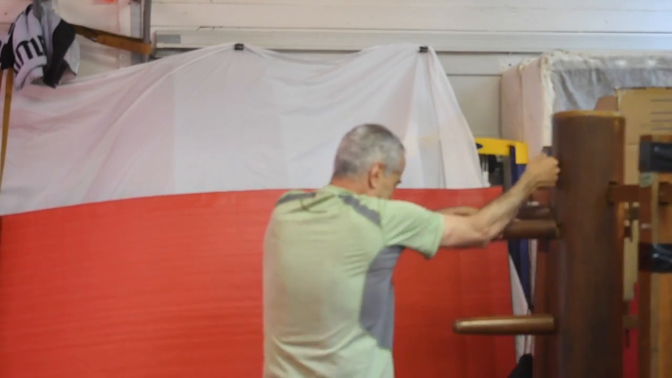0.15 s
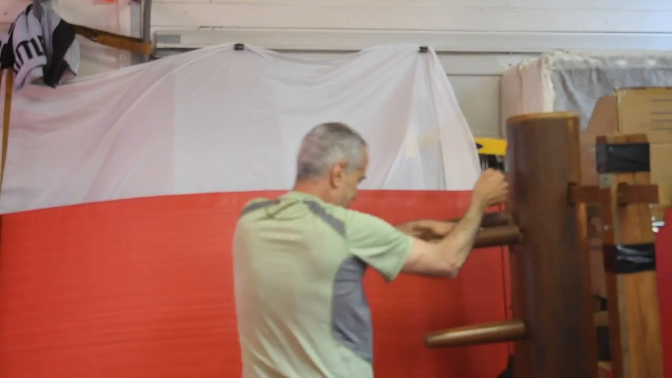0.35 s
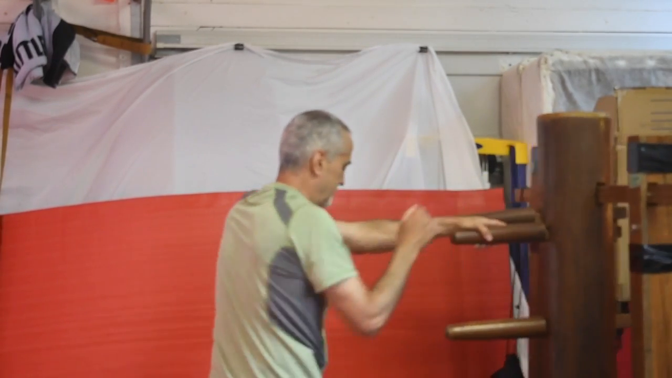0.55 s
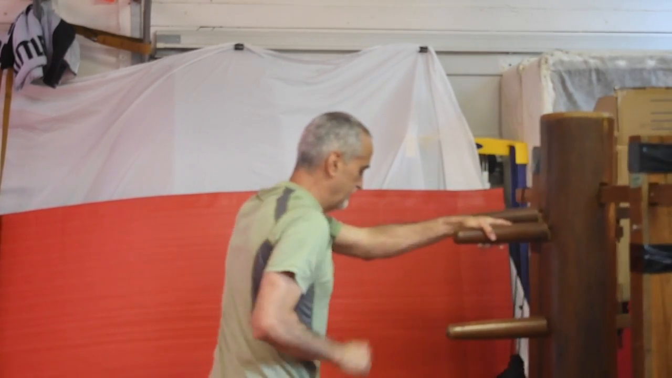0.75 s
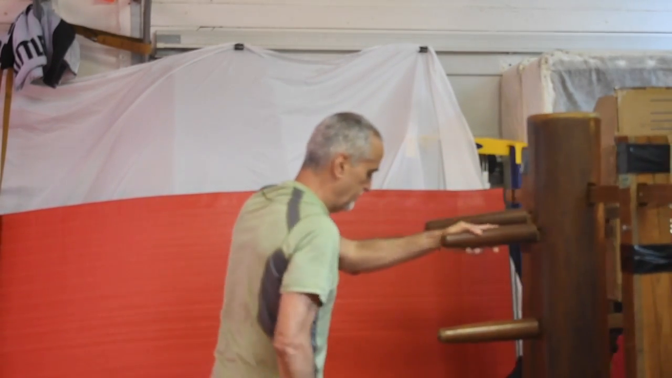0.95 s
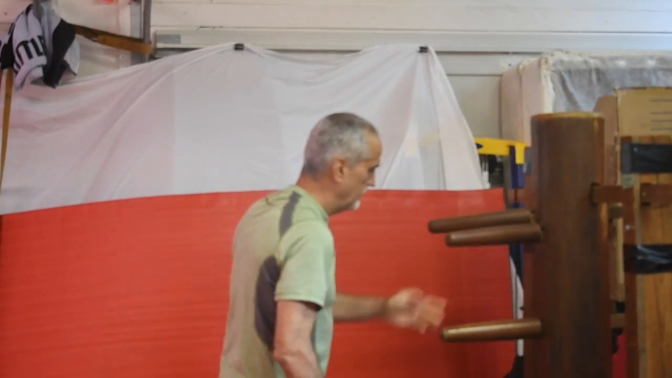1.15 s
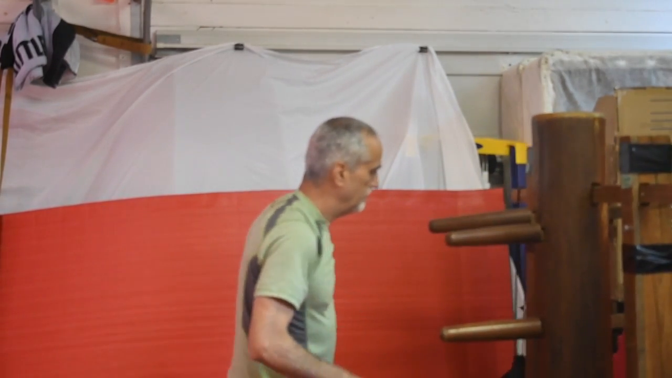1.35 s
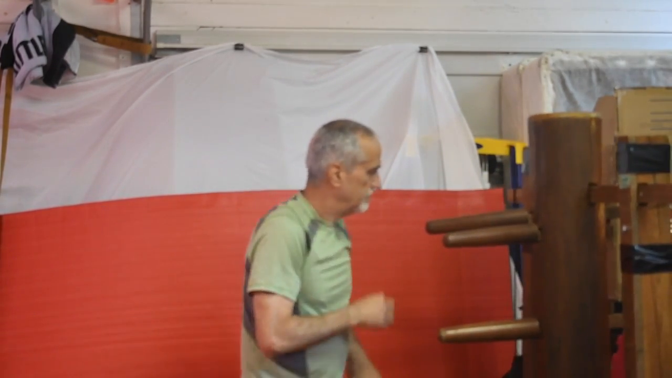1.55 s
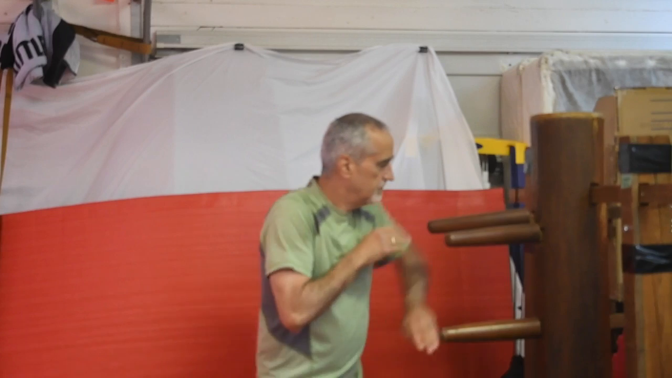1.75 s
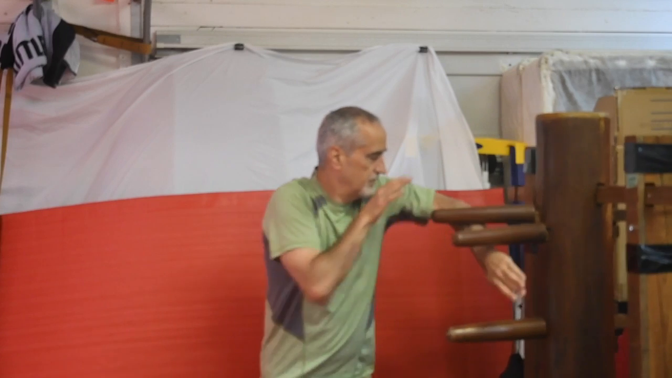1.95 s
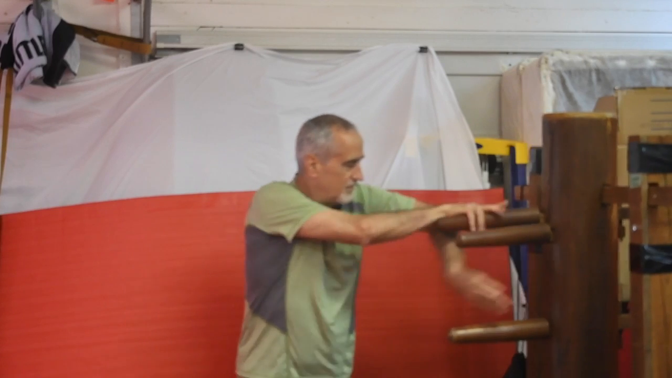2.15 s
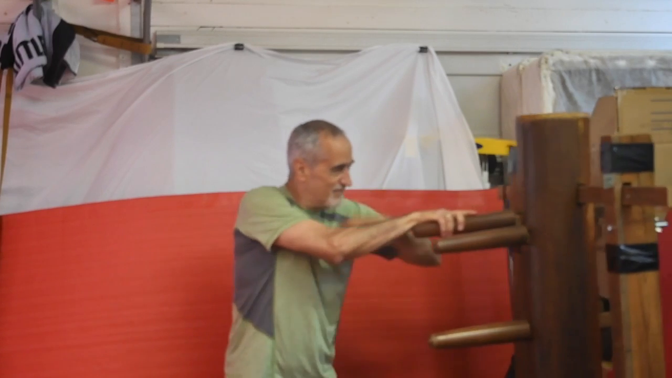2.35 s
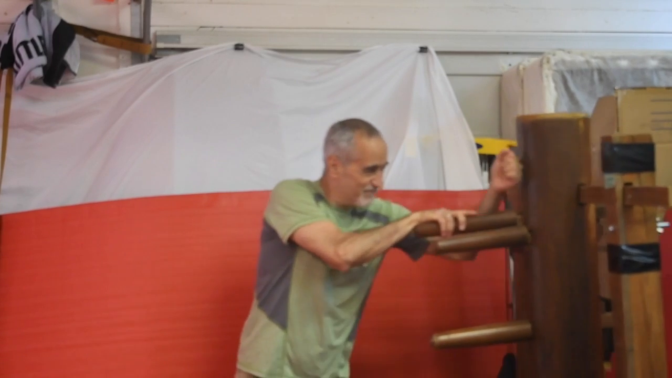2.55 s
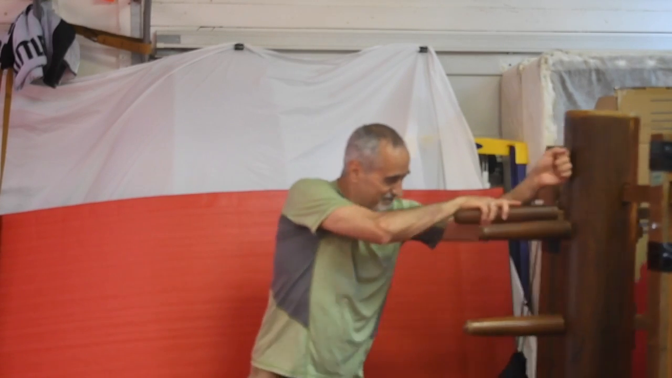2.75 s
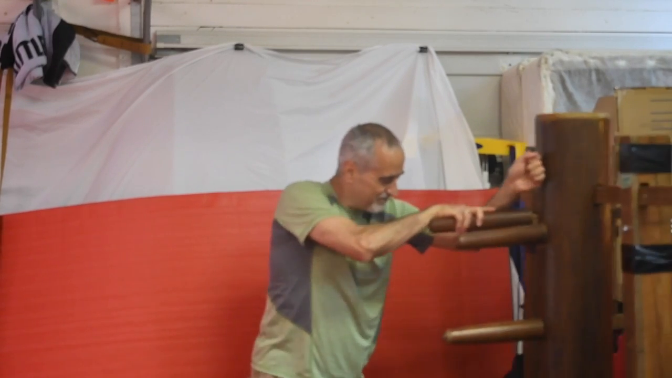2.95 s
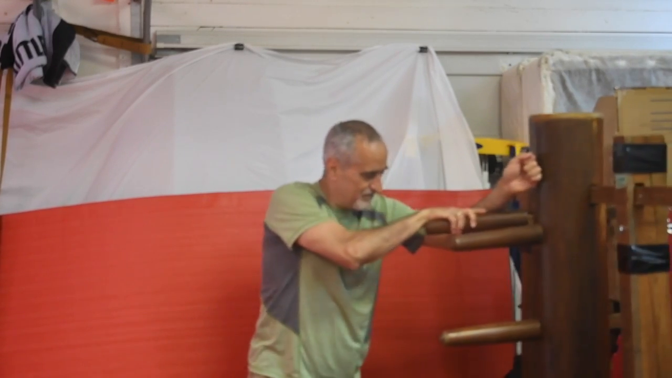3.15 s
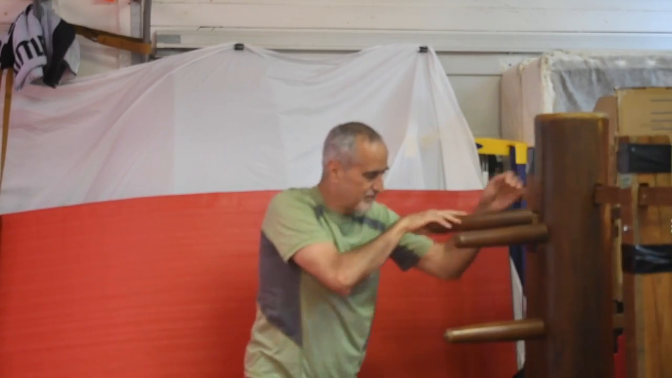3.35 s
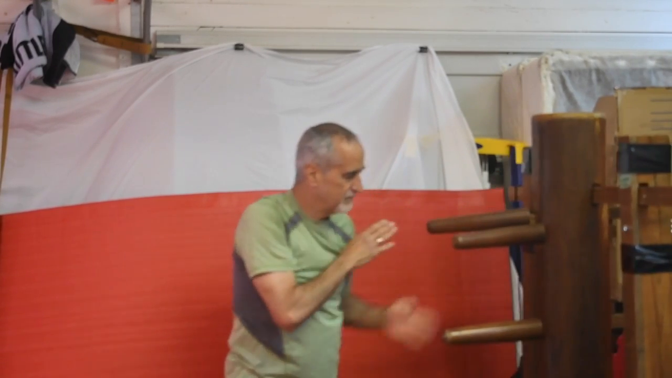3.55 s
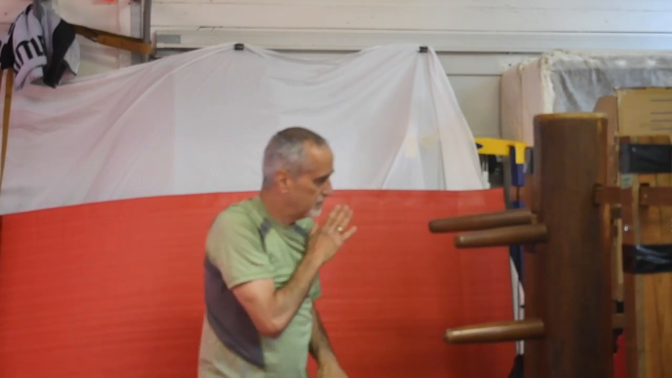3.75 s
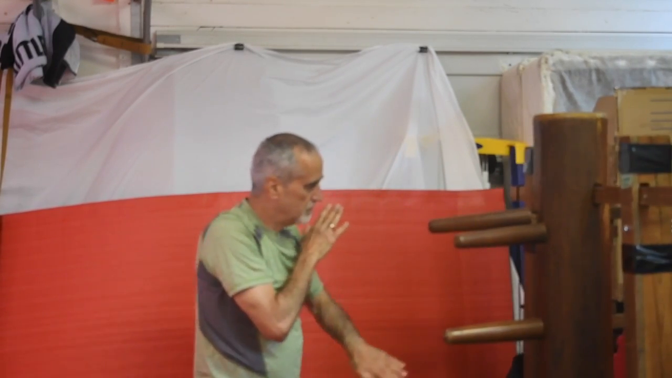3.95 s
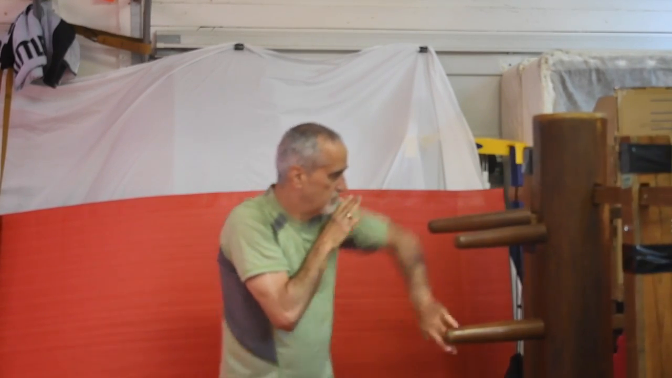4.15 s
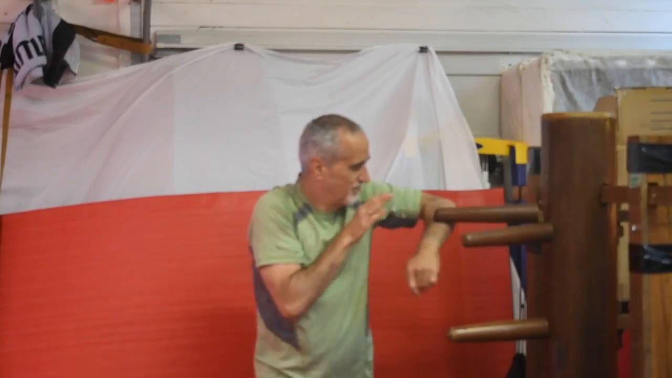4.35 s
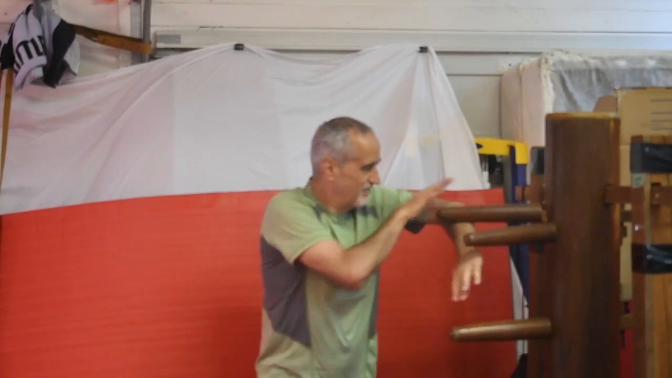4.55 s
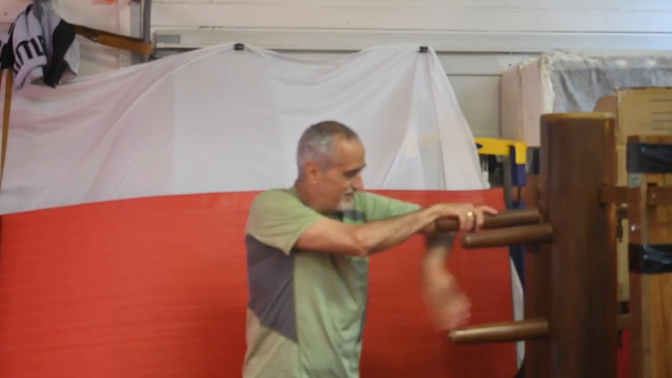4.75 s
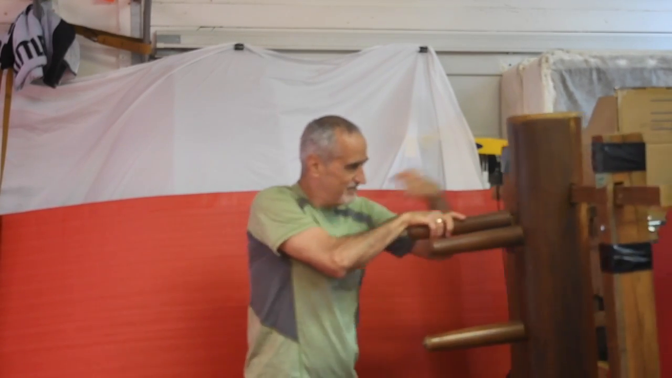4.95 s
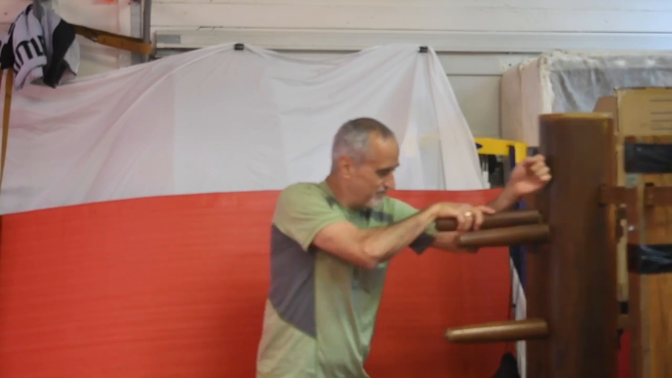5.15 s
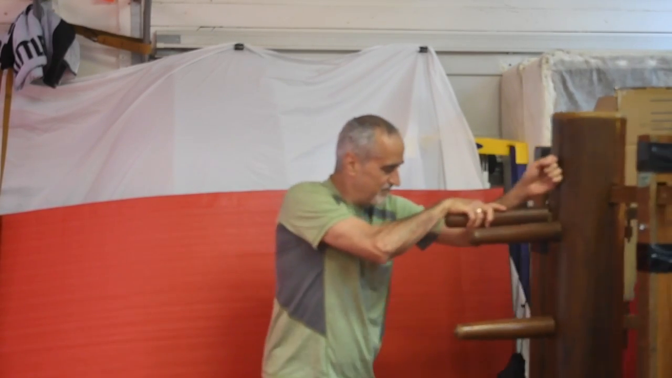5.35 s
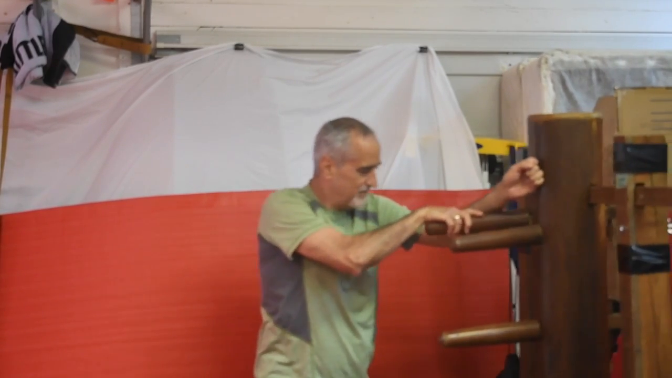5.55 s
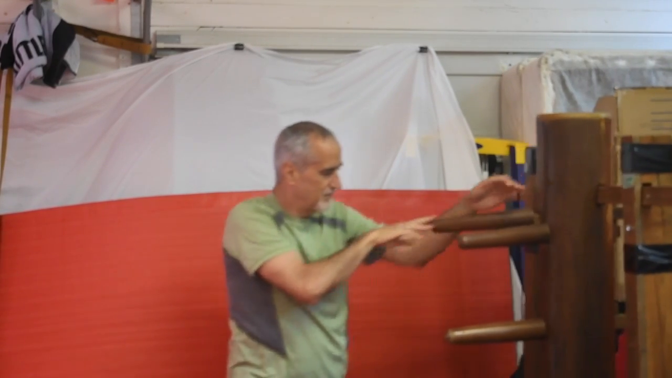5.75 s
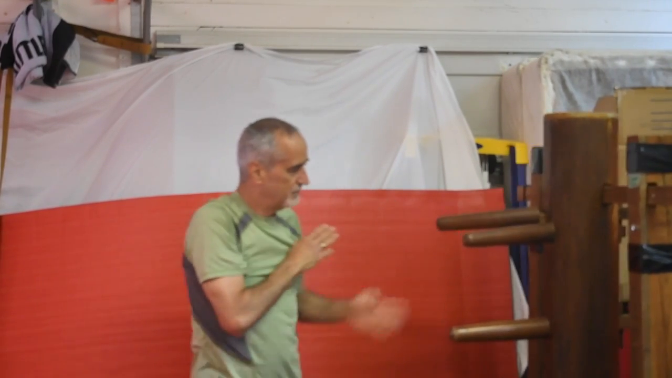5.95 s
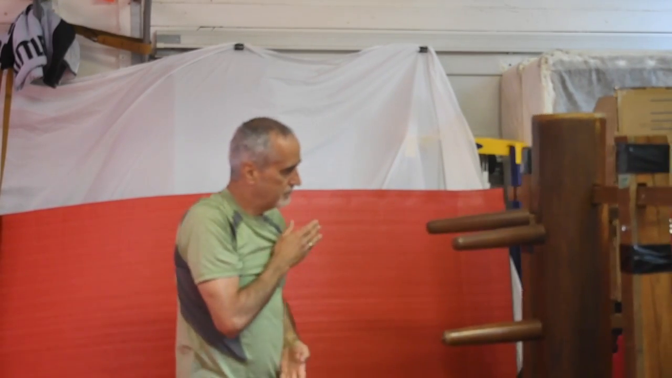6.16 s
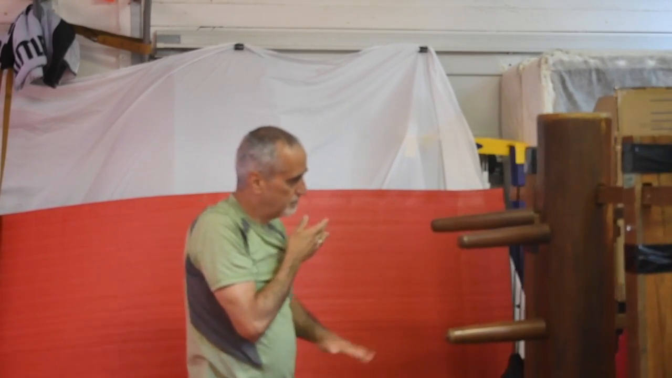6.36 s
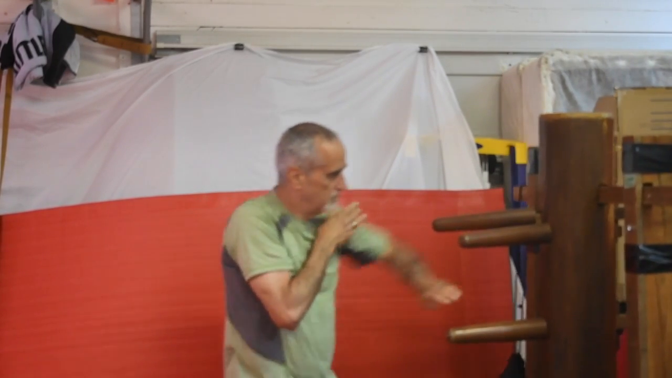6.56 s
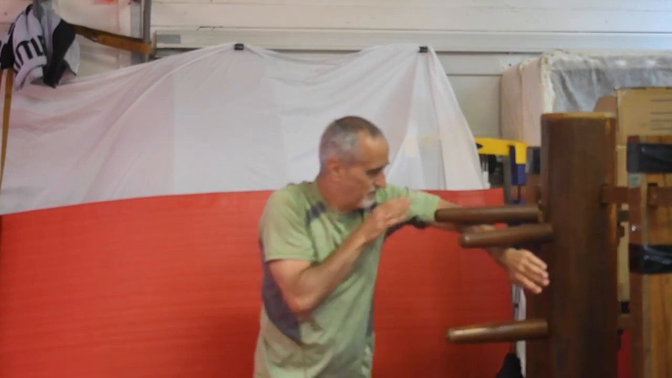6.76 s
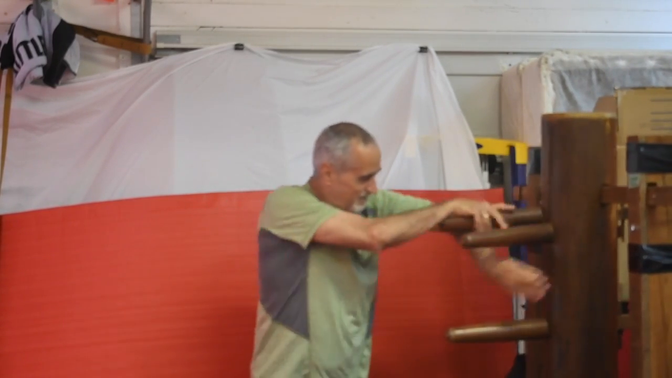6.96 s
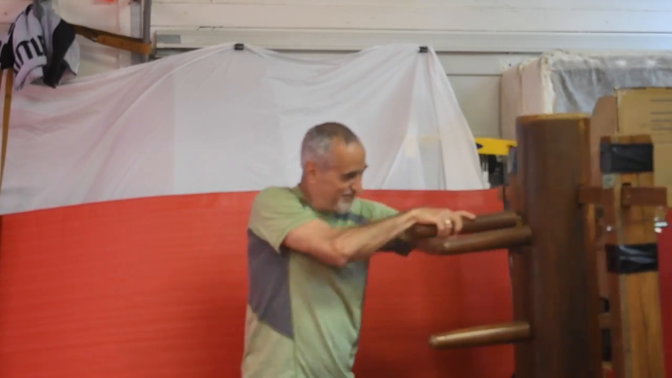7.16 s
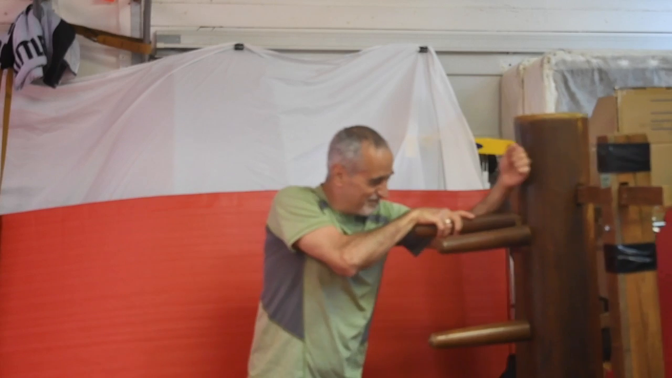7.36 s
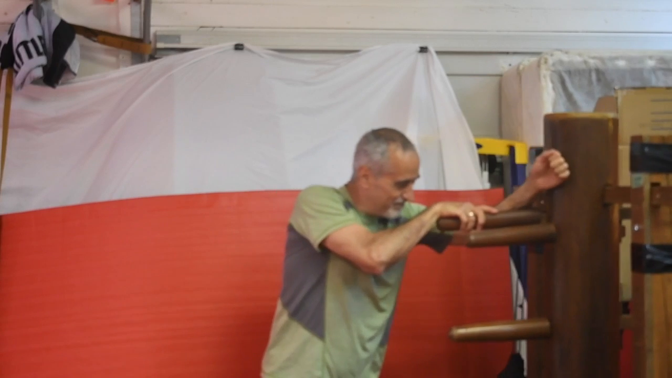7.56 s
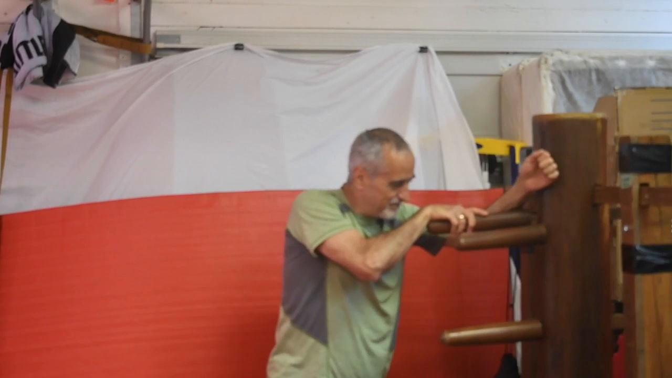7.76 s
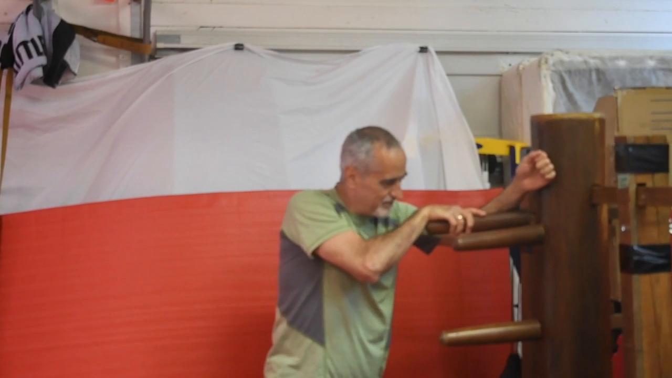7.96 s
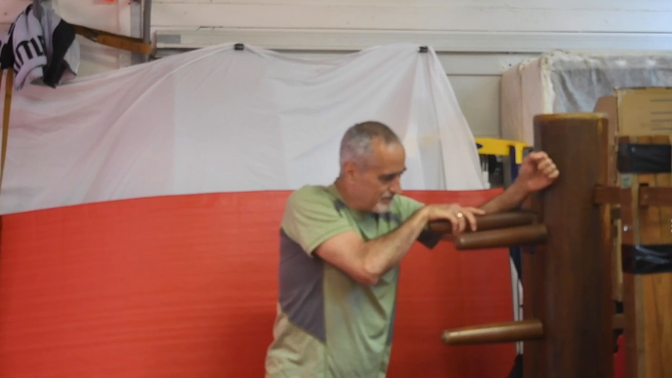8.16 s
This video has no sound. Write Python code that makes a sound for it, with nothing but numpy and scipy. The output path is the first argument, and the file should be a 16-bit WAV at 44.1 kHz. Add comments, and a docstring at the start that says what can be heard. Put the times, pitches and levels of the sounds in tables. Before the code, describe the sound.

In a hard-walled room with faint hush and mains hum, a wooden training dummy is struck in flurries. It opens at 0 s with a rattling thud, hand grips and a brief high squeak, another thud at 0.3, a slap, then clacks at 0.65 and 0.85. From 1.0 to 1.8 it quiets to small bumps. At 1.9 a very hard clack bursts out, followed by knocks, a slap and thuds until about 3.05. A lull holds only faint touches until 4.2, when clacks and tiny squeaks start a second flurry, loudest at 4.3, with a sharp knock at 4.76 and thuds and grips to 5.55. A slap at 5.75 and soft bumps fade away. At 6.7 another crashing clack leads quick knocks and a slap near 7.1, then small rattles to 8 s. The hardest blows sound squashed and ring briefly.

```python
"""Wooden training dummy, hard-walled room

Stereo, dummy slightly right of centre: hands and forearms strike it in quick flurries.
Arms clack in their slots, the trunk thuds and rattles on its frame, palms slap, hands grip, soft touches
tick and bump, feet shift: each is a click, noisy chatter and decaying room noise, filtered by resonances.
Dry wood squeaks as wavering tones over a room hush with faint mains hum.
The camera's limiter holds the hardest blows flat until the room has died down."""
import sys
import numpy as np
from scipy import signal
from scipy.fft import rfft, irfft, next_fast_len
from scipy.io import wavfile

SR = 44100
rng = np.random.default_rng(int(sys.argv[2]) if len(sys.argv) > 2 else 0)


def output_pcm(signal):
    """Save a mono or channel-first signal as 16-bit PCM at the path in sys.argv[1].

    Samples are clipped to [-1, 1] before scaling.
    """
    pcm = np.clip(np.atleast_2d(signal).T, -1, 1) * 32767
    wavfile.write(sys.argv[1], SR, np.round(pcm).astype(np.int16))


N = 362061

# Centres of thud, knock, level, clack, crack and top treble: [Hz]
BAND_CENTRES = [330, 750, 1300, 2300, 7000, 13000]
# Colour shared by all contacts: (frequency [Hz], relative gain [dB])
CONTACT_COLOUR = [(25, -36), (48, -27), (65, -12.5), (88, -31), (120, -19), (200, -6), (330, -2),
                  (550, -2.5), (1000, -2), (2550, -1), (3050, -5.5), (4300, -2), (9700, -5.5), (12000, -14),
                  (15500, -28.5)]
# Resonances of the room (lowest ones) and of trunk, arms and frame:
# (centre [Hz], half width [Hz], typical lift [dB])
RESONANCES = [(186.8, 3.1, 4.5), (259, 13, -0.5), (360, 3.8, 6.5), (458.5, 5.6, 3), (563, 8.1, 2),
              (896, 8, 0), (1045, 20, 3.5), (1290, 15, -15), (1567, 3.7, 6), (1816, 4.6, 7), (1900, 2.9, 4),
              (1960, 6.2, -9), (2160, 4.9, 7.5), (2478, 23, 1), (3100, 7.8, 4.5), (3436, 100, 1.5),
              (3980, 30, 1.5), (4476, 18, 5), (4850, 15, 5), (5620, 37, 4.5), (6160, 51, 5),
              (7100, 25, 1.5), (9030, 103, 4.5), (9450, 23, 2)]
# Wood slipping in a slot: (time [s], length [s], central pitch [Hz], level [dB])
SLOT_SQUEAKS = [(0.15, .05, 3090, -22), (3.425, .025, 1754, -54), (3.435, .1, 2650, -52),
                (4.17, .04, 2580, -37), (4.3, .08, 5480, -25), (4.708, .012, 3817, -30),
                (4.709, .012, 4996, -40), (4.712, .02, 2622, -34), (4.762, .03, 5470, -32)]
# Early decay of the room: (frequency [Hz], time to fall 60 dB [s])
ROOM_DECAY = [(100, 0.65), (300, 0.47), (550, .39), (1300, 0.44), (4000, 0.46), (9000, 0.47), (15000, 0.2)]
# Likeness of the two microphones in diffuse sound: (frequency [Hz], correlation [-1 to 1])
MIC_LIKENESS = [(60, 0.97), (140, 0.99), (280, 0.96), (500, 0.89), (1000, 0.71), (2000, 0.18), (4000, 0.14),
                (9000, -0.23)]
# Balance of the two microphones: (frequency [Hz], left minus right [dB])
MIC_BALANCE = [(100, 1), (1000, 1.5), (2000, .5), (4500, 1.5), (8000, 0.5), (13000, -4)]
# Spectrum of the room's hush: (frequency [Hz], relative density [dB])
HUSH_COLOUR = [(25, -15), (50, -9), (63, 6), (90, -6), (160, 2), (300, -1), (450, -3), (650, -2.5),
               (1000, -2.5), (2000, -3.5), (5000, -4), (9500, -5.5), (13000, -19), (15500, -11)]
# Mains hum: (frequency [Hz], rms level before the microphone balance [dB])
MAINS_HUM = [(120, -64.5), (360, -62.5)]
# A forearm knocks a loose arm against its slot: (time [s], level [dB], rise [s], ring [Hz], ring lift [dB],
# chatter [dB], hardness [dB])
ARM_CLACKS = [(0.653, 2, .0015, 1420, 4, 2, 6.5), (0.846, -2.5, 0.0014, 1270, 8.5, 2.5, -1.5),
              (1.893, 22.5, 0.018, 990, 3.5, 4, 10), (2.019, 10.5, 0.07, 2410, 4.5, -5, 0),
              (2.201, 3, 0.0015, 1414, 8, 7, -3.5), (4.181, -10.5, .0018, 747, 18.5, 3.5, -4),
              (4.219, -6, 0.012, 1290, -1, 12, -12), (4.28, 18, 0.014, 1900, 4, 12, -2.5),
              (4.759, 2.5, 0.0025, 1360, 9, 9.5, 3), (5.47, -6, 0.017, 1250, 3, 17, 2),
              (6.685, 19.5, 0.007, 1450, 8, -4, 0.5), (6.791, 4.5, 0.012, 1280, 10, 13, 4),
              (6.994, 0, 0.0021, 745, 14.5, 7.5, 2.5), (7.015, 5, 0.0016, 708, 14.5, 11, 1.5)]
# The trunk rocks against its frame; the rows at 1.877 s and 6.668 s are soft brushes that lead into # loud arm
# clacks: (time [s], level [dB], rise [s], ring [Hz], chatter [dB], hardness [dB])
TRUNK_THUDS = [(0.0, -7.5, 0.022, 368, 14, 14), (0.292, 4, 0.0046, 460, 7, 10),
               (0.941, -11.5, .025, 390, -4, 11), (0.996, -6.5, 0.0061, 474, 16, 0),
               (1.531, -22, 0.0023, 364, 10.5, -28), (1.877, -38, .004, 650, 11, 12),
               (2.31, -1.5, 0.04, 410, -3, 0), (3.01, -3.5, 0.012, 362, 0, 5),
               (3.04, -2.5, 0.0056, 441, 1, -9), (3.405, -32, .008, 376, 11, 19.5),
               (3.544, -34, .02, 282, 17, -7), (4.005, -42, 0.0074, 392, 15, 6),
               (4.069, -34, 0.0074, 332, 8, -12), (4.84, -3, 0.018, 427, 9, 5.5),
               (5.244, -1.5, 0.0051, 516, 9, -8), (5.521, -2.5, .027, 267, 10, 4.5),
               (5.542, -4.5, 0.0093, 367, 17, 12.5), (6.168, -23, 0.0067, 390, 14, 13),
               (6.195, -14, 0.003, 402, 13, -18), (6.527, -21, 0.0064, 325, 11, -11),
               (6.668, -30, .004, 650, -3, 2), (7.115, -9.5, 0.011, 397, -2, -2),
               (7.575, -16, 0.023, 674, 14.5, 3), (7.739, -15.5, 0.0024, 375, -2, -10),
               (7.805, -18.5, 0.0084, 1120, 11, -13)]
# A hand lands on the wood and grips it: (time [s], level [dB], rise [s], chatter [dB], hardness [dB])
HAND_GRIPS = [(0.019, 0, 0.0014, -3, -3.5), (0.139, -9, 0.0021, -3, 10), (0.148, 6.5, 0.0082, 2, 2),
              (0.585, -28, 0.0011, 8.5, 7), (0.602, -11.5, 0.0018, -4, 8.5),
              (0.877, -13.5, 0.0062, 1, -5.5), (1.573, -34, 0.005, 6, 2), (1.682, -31.5, .0015, 2, -1.5),
              (2.732, -2.5, 0.016, 9, -6), (2.745, -8.5, .002, 7, -4), (2.842, -11, 0.026, 14, 0),
              (2.868, 5, .0027, 2, 3), (3.007, -2.5, 0.0036, 0, -1), (3.586, -32.5, 0.0008, 6.5, -8),
              (4.483, -9, 0.018, -8, -7), (5.014, -20, 0.0016, 1.5, 4), (5.212, -17, 0.0072, 0, 3.5),
              (5.271, 4, 0.0019, 5, -2), (7.817, -27.5, .001, 6.5, -3)]
# An open palm slaps an arm: (time [s], level [dB], ring [Hz], ring lift [dB], hardness [dB])
PALM_SLAPS = [(0.364, -7.5, 4200, 1, -6.5), (1.298, -34.5, 2840, 16.5, -3), (2.297, -8, 4170, 4, -9),
              (5.747, -13.5, 2120, 10, 0), (7.112, -7.5, 2140, 11.5, 3.5)]
# Soft touches, small ticks and bumps with chattering noise: (time [s], level [dB], rise [s])
SOFT_TOUCHES = [(2.42, -19.5, 0.013), (2.52, -19, 0.024), (2.655, -8.5, 0.15), (3.321, -33, 0.042),
                (5.881, -17, 0.04), (5.988, -16, 0.14), (6.399, -34, 0.044), (6.487, -30, 0.025),
                (7.508, -19.5, 0.072)]
# Feet shift on the floor: (time [s], level [dB])
FOOTSTEPS = [(0.589, -22), (2.24, -20), (2.465, -40), (2.609, -41), (3.0, -31), (5.089, -34),
             (5.489, -18.5), (6.799, -15), (7.255, -26.5), (7.434, -37), (7.739, -34)]
# Colour of each kind of contact, relative to its gain at 1.3 kHz, before blow strength and hardness:
# (thud [dB], knock [dB], clack [dB], crack [dB])
CLACK_BANDS = (-8.5, -3, -3.7, -18.5)
THUD_BANDS = (2.5, 2.5, -10, -24)
GRIP_BANDS = (4, 2.5, 0, -2)
SLAP_BANDS = (-8.5, -11, 6, 14.5)
TOUCH_BANDS = (1, 1, 1.5, -2)
STEP_BANDS = (5, 2, -6, -13)


def amp(db):
    """Decibels to gain."""
    return 10 ** (np.asarray(db) / 20)


def rms(x):
    """Root mean square."""
    return np.sqrt(np.mean(x ** 2) + 1e-20)


def unit(x):
    """x scaled to rms 1."""
    return x / rms(x)


def along(points, hz):
    """(frequency [Hz], value) points read on a log frequency axis."""
    f, value = np.transpose(points)
    return np.interp(np.log(hz + 1), np.log(f + 1), value)


def filtered(x, response):
    """x times a response of frequency."""
    n = x.shape[-1]
    padded = next_fast_len(n + SR // 8, True)
    hz = np.fft.rfftfreq(padded, 1 / SR)
    return irfft(rfft(x, padded) * response(hz), padded)[..., :n]


def causal(db):
    """The minimum-phase response with this gain: it rings only after the blow."""
    cepstrum = irfft(np.log(amp(db)))
    half = len(cepstrum) // 2
    return np.exp(rfft(np.r_[cepstrum[0], 2 * cepstrum[1:half]], 2 * half))


def add(track, s, x):
    """Mix x into the track from time s."""
    start = max(round(s * SR), 0)
    track[:, start:start + x.shape[-1]] += x[:, :N - start]


def diffuse(n):
    """White noise from all sides: the two microphones agree in the bass and part in the treble."""
    def split(hz):
        angle = np.arccos(np.clip(along(MIC_LIKENESS, hz), -1, 1)) / 2
        return np.array([np.cos(angle), np.sin(angle)])

    mid, side = filtered(rng.standard_normal((2, n)), split)
    return np.array([mid + side, mid - side])


def room_tail(late_db=-29, late_t60=1.0):
    """A fresh answer of the walls: a quick decay by frequency, then a faint longer one."""
    hz, t, z = signal.stft(diffuse(SR * 3 // 4), SR, nperseg=256)
    early = amp(-60 * t / along(ROOM_DECAY, hz)[:, None])
    late = amp(late_db - 60 * t / late_t60)
    return signal.istft(z * np.hypot(early, late), SR, nperseg=256)[1]


def chatter(n, t60=0.046, grain_db=3):
    """A rattling burst: unevenly swelling noise that dies quickly."""
    t = np.arange(n) / SR
    grains = n // 80  # one random size every 80 samples
    sizes = np.interp(t, np.arange(grains) * 80 / SR, rng.standard_normal(grains))
    return unit(diffuse(n) * amp(grain_db * sizes)) * amp(-60 * t / t60)


def ring_peak(hz, at_hz, lift_db, width=0.028):
    """Power gain of a broadened ring: a cluster of three close peaks, used for every contact."""
    ratios, shares = np.array([[.95], [1], [1.07]]), np.array([[.35], [.8], [.35]])
    cluster = np.sum(shares / (1 + ((hz / at_hz / ratios - 1) / width) ** 2), axis=0)
    return 1 + (amp(lift_db) ** 2 - 1) * cluster


def contact_colour(hz, ring_hz, ring_db, tone_db, overtone=1.996, overtone_share=0.26,
                   scatter_db=2.0, ripple_db=2.5):
    """Gain in dB of one contact: band balance, resonances at new strengths, and the contact's own ring."""
    centre, width, lift_db = np.transpose(RESONANCES)[:, :, None]
    strength = amp(lift_db + scatter_db * rng.standard_normal(centre.shape)) ** 2
    modes = 1 + np.sum(np.maximum(strength - 1, 0) / (1 + ((hz - centre) / width) ** 2), axis=0)
    ring = ring_peak(hz, ring_hz, ring_db)
    ring = ring * ring_peak(hz, ring_hz * overtone, ring_db * overtone_share)
    resonance_db = 10 * np.log10(np.maximum(modes * ring, .1))
    # the crowd of weak upper modes changes with the spot that is struck
    crowd = np.interp(hz, np.linspace(0, SR / 2, 300), rng.standard_normal(300))
    crowd = crowd * np.minimum(hz / 1500, 1)
    balance_db = along(list(zip(BAND_CENTRES, tone_db)), hz)
    return along(CONTACT_COLOUR, hz) + balance_db + resonance_db + ripple_db * crowd


def contact(s, db, rise, bands, ring_hz, ring_db, chatter_db, hard_db=0,
            bass_lag=0.24, clack_share=0.2, treble_slope=0.086):
    """One touch: stronger blows are shorter, so bass grows more slowly; hardness adds clack and crack."""
    thud_db, knock_db, clack_db, crack_db = bands
    thud_db = thud_db - bass_lag * db  # dB of thud lost for each dB of level
    clack_db = clack_db + clack_share * hard_db
    crack_db = crack_db + hard_db
    # the harder the contact, the further its crack reaches into the top treble
    top_db = crack_db + treble_slope * (crack_db - clack_db)
    tone_db = [thud_db, knock_db, 0, clack_db, crack_db, top_db]
    return s, db, rise, ring_hz, ring_db, chatter_db, tone_db


def strike(contacts, click_db=13, sharp_rise=0.0046, build=0.004, size=32768):
    """Each contact is a first click, a chatter and the room's answer, all in that contact's colour."""
    out = np.zeros((2, N))
    hz, t = np.fft.rfftfreq(size, 1 / SR), np.arange(size) / SR
    echoes = 1 - np.exp(-t / build)  # wall reflections take a moment to pile up
    for s, db, rise, ring_hz, ring_db, chatter_db, tone_db in contacts:
        # a padded forearm loads the wood slowly; a sudden contact clicks most
        loading = np.sqrt(1 - np.exp(-t / max(rise, 1e-4)))
        rattle = loading * amp(chatter_db) * chatter(size)
        force = loading * (echoes * room_tail()[:, :size] + rattle)
        force[:, 0] += amp(click_db) * np.exp(-rise / sharp_rise)
        colour = causal(contact_colour(hz, ring_hz, ring_db, tone_db))
        add(out, s, amp(db) * irfft(rfft(force) * colour))
    return out


def room_tone(db=-49.5):
    """The steady hush of the room as coloured diffuse noise, with faint sines of mains hum."""
    t = np.arange(N) / SR
    hum = sum(amp(level) * np.sqrt(2) * np.sin(2 * np.pi * hz * t) for hz, level in MAINS_HUM)
    hush = unit(filtered(diffuse(N), lambda hz: amp(along(HUSH_COLOUR, hz))))
    return hum + amp(db) * hush


def trunk_thuds():
    """The trunk rocks against its frame: strong low bands and a ring at its own pitch. Two rows are instead
    soft brushes that lead into loud arm clacks."""
    return strike([contact(s, db, rise, THUD_BANDS, hz, ring_db=8.0, chatter_db=loose, hard_db=hard)
                   for s, db, rise, hz, loose, hard in TRUNK_THUDS])


def hand_grips():
    """A hand lands and holds on: full lows and highs, with only a modest ring."""
    return strike([contact(s, db, rise, GRIP_BANDS, ring_hz=1430, ring_db=5, chatter_db=loose, hard_db=hard)
                   for s, db, rise, loose, hard in HAND_GRIPS])


def squeaks(waver=0.016):
    """Dry wood slips in its slot: short, slightly unsteady tones that linger in the room."""
    out = np.zeros((2, N))
    for s, length, pitch_hz, db in SLOT_SQUEAKS:
        n = round(length * SR)
        drift = np.interp(np.arange(n), np.linspace(0, n, 8), rng.standard_normal(8))
        phase = 2 * np.pi * np.cumsum(pitch_hz * (1 + waver * drift)) / SR
        tone = np.sin(phase) * np.linspace(1, 0, n)
        heard = signal.fftconvolve(tone[None], room_tail(), axes=1)
        add(out, s, amp(db) * heard / rms(heard[:, :2 * n]))
    return out


def palm_slaps():
    """An open palm slaps an arm: little thud, much crack."""
    return strike([contact(s, db, 0.0043, SLAP_BANDS, hz, ring, chatter_db=9.5, hard_db=hard)
                   for s, db, hz, ring, hard in PALM_SLAPS])


def footsteps():
    """Feet shift on the floor: bass-heavy contacts with a low ring."""
    return strike([contact(s, db, .005, STEP_BANDS, ring_hz=167.7, ring_db=16.5, chatter_db=8)
                   for s, db in FOOTSTEPS])


def arm_clacks():
    """A forearm knocks a loose arm against its slot: each blow has its own ring, chatter and hardness."""
    return strike([contact(s, db, rise, CLACK_BANDS, hz, ring, loose, hard)
                   for s, db, rise, hz, ring, loose, hard in ARM_CLACKS])


def soft_touches():
    """Small ticks and bumps: chattering noise in a nearly even band balance."""
    return strike([contact(s, db, rise, TOUCH_BANDS, ring_hz=1600, ring_db=4, chatter_db=10)
                   for s, db, rise in SOFT_TOUCHES])


def scene(lag=2e-5):
    """The dummy stands a little to the right: sound reaches the left microphone lag seconds later."""
    sound = room_tone() + trunk_thuds() + hand_grips() + squeaks()
    sound = sound + palm_slaps() + footsteps() + arm_clacks() + soft_touches()
    sides = np.array([[.5], [-.5]])  # left, right

    def microphones(hz):
        return amp(sides * along(MIC_BALANCE, hz)) * np.exp(-2j * np.pi * hz * lag * sides)

    return filtered(sound, microphones)


def limiter(x, ceiling_db=-7.0, attack=0.00057, knee=4):
    """The gain follows the running power; it lags a little, so the front of a hard blow slips through."""
    keep = np.exp(-1 / (attack * SR))
    power = signal.lfilter([1 - keep], [1, -keep], np.mean(x ** 2, axis=0))
    level = np.sqrt(power)
    return x / (1 + (level / amp(ceiling_db)) ** knee) ** (1 / knee)


def record(dry, top=0.86, knee=5, band_hz=15650):
    """The camera limits, rounds off what is left of the peaks, and keeps nothing above its band."""
    x = limiter(dry)
    x = x / (1 + np.abs(x / top) ** knee) ** (1 / knee)
    return filtered(x, lambda hz: hz < band_hz)


dry = scene()
out = record(dry)
output_pcm(out)
```